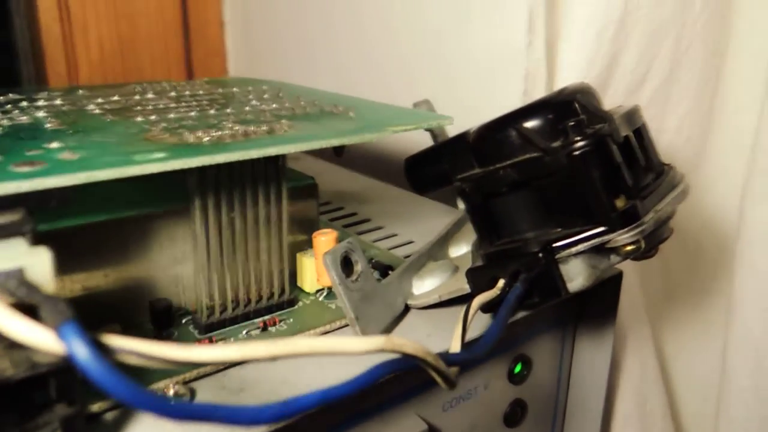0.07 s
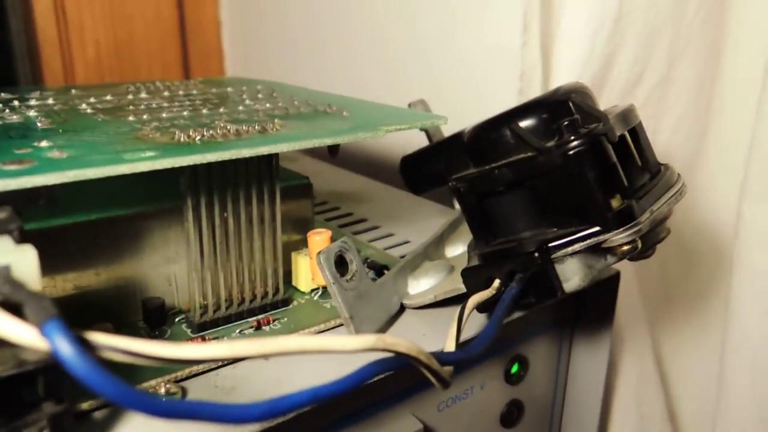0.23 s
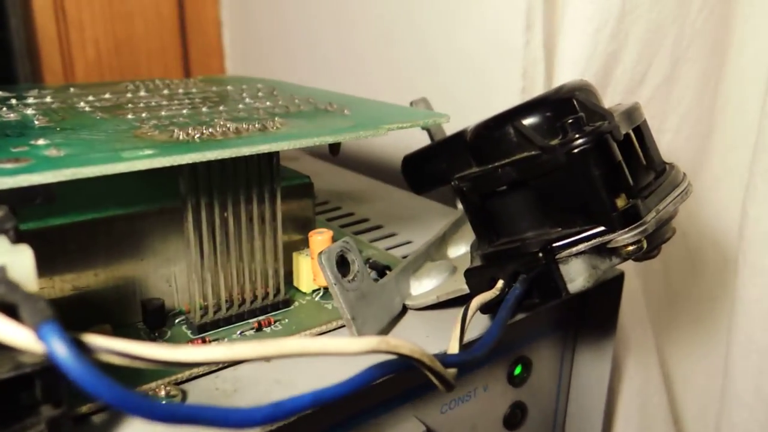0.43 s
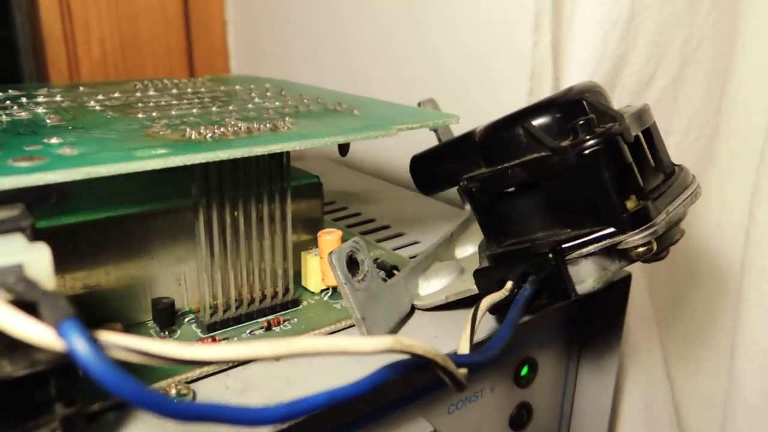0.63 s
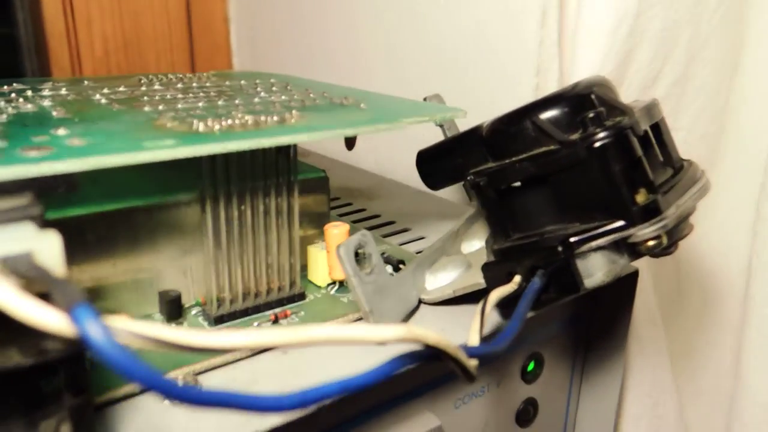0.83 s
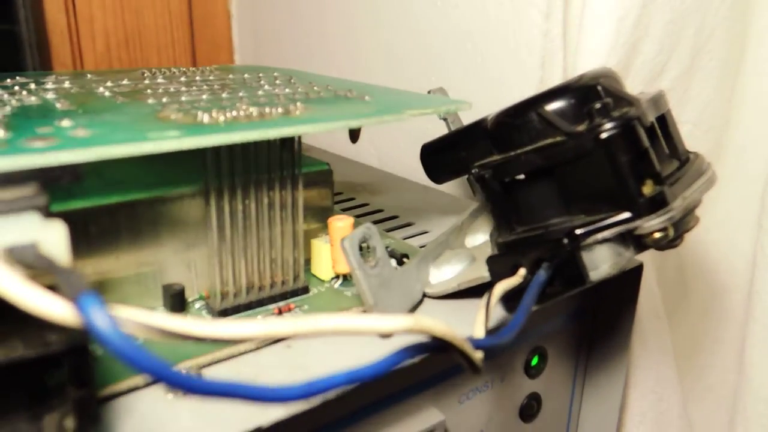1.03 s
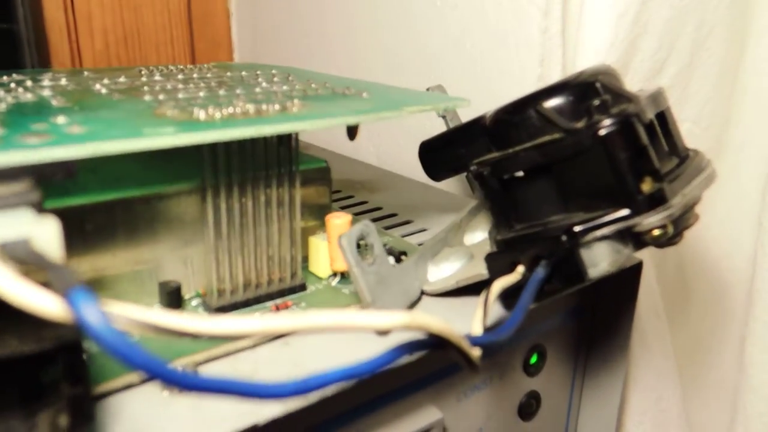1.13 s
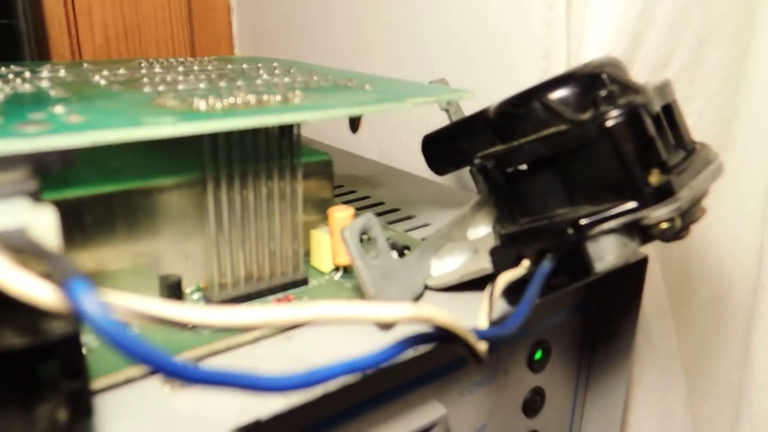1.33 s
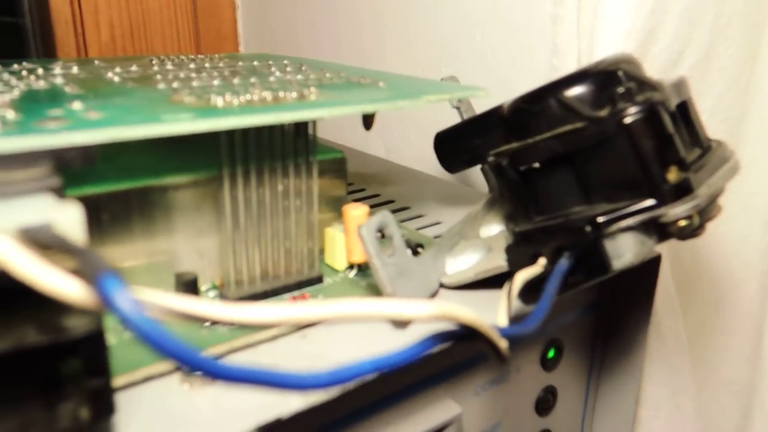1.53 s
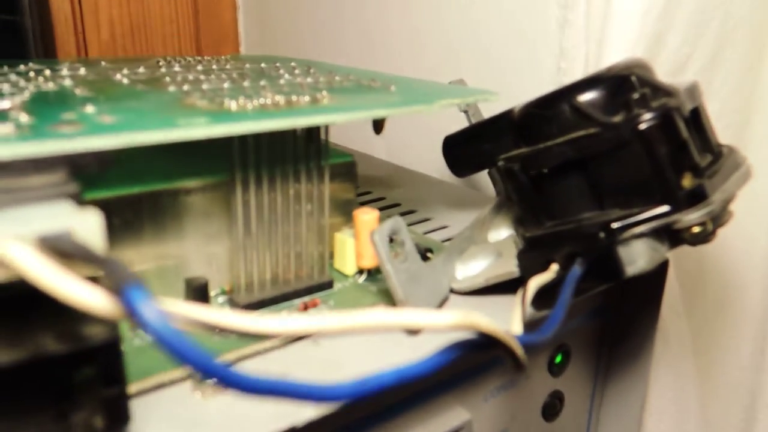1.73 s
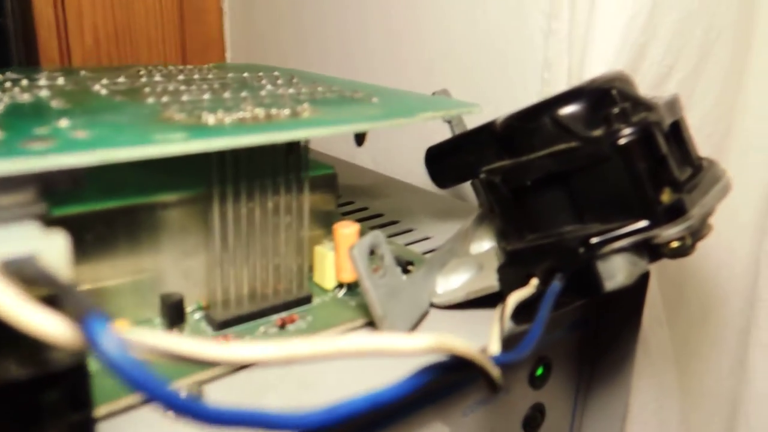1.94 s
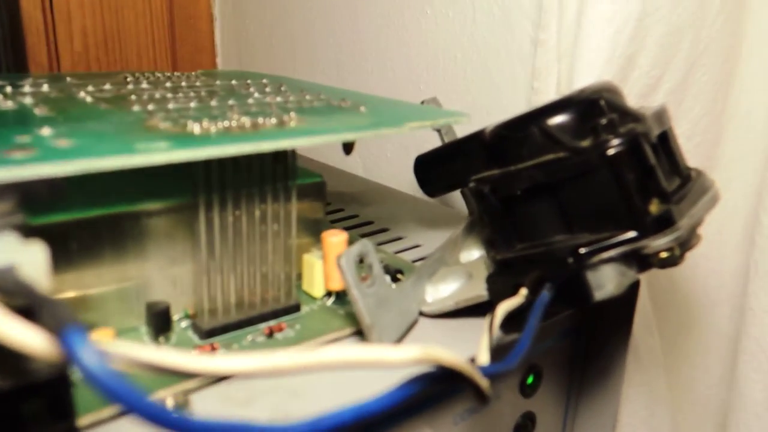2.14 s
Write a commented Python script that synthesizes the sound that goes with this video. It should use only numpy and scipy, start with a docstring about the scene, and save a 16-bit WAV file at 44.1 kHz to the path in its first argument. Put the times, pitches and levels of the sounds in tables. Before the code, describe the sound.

One sharp metallic relay click inside an electronic unit, with faint hiss behind it.

```python
"""Relay click in an opened unit

A relay snaps once, close and a little to the left: its armature strikes and bounces,
and frame and chassis ring briefly in a small, dry room. Behind it lie room noise, hiss,
a distant fan, a faint mains-modulated whine and, later, one soft low rumble."""
import sys
import numpy as np
from scipy import signal
from scipy.fft import rfft, irfft, next_fast_len
from scipy.io import wavfile
from scipy.ndimage import map_coordinates

SR = 44100
rng = np.random.default_rng(int(sys.argv[2]) if len(sys.argv) > 2 else 0)


def materialize(psi):
    """Save the field psi as 16-bit PCM at rate SR to the path in sys.argv[1].

    A 1-D psi becomes a single channel; in a 2-D psi each row is a channel.
    """
    bounded = np.clip(np.atleast_2d(psi).T, -1, 1)
    quanta = np.round(bounded * 32767).astype(np.int16)
    wavfile.write(sys.argv[1], SR, quanta)


N = 97020
TOP_HZ = 14300


def amp(db):
    """Decibels to gain."""
    return 10 ** (np.asarray(db) / 20)


def unit(x):
    """Scale each channel to rms 1."""
    return x / np.sqrt(np.mean(x ** 2, axis=-1, keepdims=True) + 1e-20)


def along(points, hz):
    """Interpolate (frequency, value) points on a log axis."""
    knots_hz, values = np.transpose(points)
    return np.interp(np.log(hz + 1), np.log(knots_hz + 1), values)


def pan(db):
    """Stereo gains for a left-minus-right level."""
    return amp([[db / 2], [-db / 2]])


def fade(t, t60_s):
    """Exponential decay, 60 dB in t60_s."""
    return np.exp(-np.log(1000) * t / t60_s)


def filtered(x, response):
    """Apply a frequency response by FFT."""
    size = x.shape[-1]
    padded = next_fast_len(2 * size)
    return irfft(rfft(x, padded) * response(np.fft.rfftfreq(padded, 1 / SR)), padded)[..., :size]


def noise(colour, size):
    """Two independent noises of the given spectrum, rms 1."""
    return unit(filtered(rng.standard_normal((2, size)), lambda hz: amp(along(colour, hz))))


def wobble(knots_per_s):
    """Smooth random curve."""
    return map_coordinates(rng.standard_normal(128), [np.arange(N) * knots_per_s / SR], mode="mirror")


def narrow_noise(hz, knots_per_s):
    """Tone of wandering level and phase, rms 1."""
    phase = 2 * np.pi * hz * np.arange(N) / SR
    return unit(wobble(knots_per_s) * np.sin(phase) + wobble(knots_per_s) * np.cos(phase))


# noise spectrum (frequency [Hz], relative density [dB])
NOISE_COLOUR = [(20, 0.3), (32, 2), (45, -4), (80, -3), (115, 0.8), (170, -3), (220, -2), (250, -3),
                (310, 0), (380, -6), (450, -7), (505, -6), (570, -8), (820, -7), (900, -7), (980, -6),
                (1100, -11), (1700, -14.5), (3000, -14.5), (4200, -17), (7000, -20), (14000, -20)]
# left-right likeness (frequency [Hz], correlation [0-1])
NOISE_CORRELATION = [(60, 0.8), (130, 0.78), (280, 0.64), (620, 0.42), (1350, 0.44), (2950, 0.25),
                     (6420, 0.034), (14000, 0.07)]


def room_noise(level_db=-48.5):
    """Steady room noise, near mono in the bass, under a wide hiss."""
    def mid_side_gains(hz):
        angle = np.arccos(along(NOISE_CORRELATION, hz)) / 2
        return np.array([np.cos(angle), np.sin(angle)])

    mid, side = filtered(noise(NOISE_COLOUR, N), mid_side_gains)
    return amp(level_db) * unit(np.array([mid + side, mid - side]))


# fan hum (frequency [Hz], level [dB])
FAN_TONES = [(285, -69.5), (506, -70), (646, -72), (824, -68), (985, -68)]


def fan():
    """Faint, blurred tones of a distant fan."""
    return sum(amp(db) * narrow_noise(hz, knots_per_s=22) for hz, db in FAN_TONES)


# whine lines (offset before rounding [ripple steps], mid-scene level [dB], drift [dB/s])
WHINE_LINES = [(-6, -90, 0), (-5.5, -78, 4), (-3, -82, -6), (-1, -71.5, -3), (0.5, -72, 1), (-2.5, -72, 1),
               (1.5, -72, 5.5), (2.5, -81, -7), (7.5, -77, 0), (9.5, -73.5, 0)]


def whine(centre_hz=10608, ripple_hz=100, noise_share=0.22, right_phase_rad=1.26):
    """Thin tones spaced by rectified mains ripple, wavering separately in each channel."""
    t, out = np.arange(N) / SR, np.zeros((2, N))
    for step, db, drift_db_per_s in WHINE_LINES:
        hz = centre_hz + round(step) * ripple_hz
        phase = 2 * np.pi * (hz * t + rng.random())
        steady = np.sqrt(2) * np.sin([phase, phase + right_phase_rad])
        waver = np.array([narrow_noise(hz, knots_per_s=8.8) for _ in range(2)])
        gain = amp(db + drift_db_per_s * (t - t.mean()))
        out += gain * unit(np.sqrt(1 - noise_share) * steady + np.sqrt(noise_share) * waver)
    return out


LEAD_S = 0.002  # room for the crack to build before each blow
CHANNEL_LAG_S = np.array([[0], [0.00008]])


def air_push(t, width_s=0.00041, suction=0.7, left_db=-4, right_db=-21):
    """Pressure pulse of a blow, followed by suction."""
    u = t / width_s
    return amp([[left_db], [right_db]]) * (1 - suction * u * u) * np.exp(-u * u / 2)


# crack spectrum (frequency [Hz], gain [dB], left minus right [dB])
CRACK_SPECTRUM = [(300, -24, 0), (1200, -8, -13), (1700, -8.5, -5), (2270, 10, 3), (2930, 13.5, 7),
                  (3750, 6, -4.5), (4940, 10.5, -8), (5600, 7.5, 14.5), (6600, 5.5, 15.5), (8000, 7, 3),
                  (8600, 1, 9.5), (10300, 3.5, 2), (11860, 5.5, -5), (12900, -9, -12), (14200, -3, -6)]


def crack(size, spread_s=0.00118):
    """Sharp pulse, dispersed in the metal: high bending waves outrun low ones."""
    hz = np.fft.rfftfreq(size, 1 / SR)
    points = np.array(CRACK_SPECTRUM)
    db, side_db = along(points[:, [0, 1]], hz), along(points[:, [0, 2]], hz)
    gain = amp([db + side_db / 2, db - side_db / 2])
    delay_s = LEAD_S + CHANNEL_LAG_S + spread_s * (1 - np.sqrt(np.minimum(hz / TOP_HZ, 1)))
    phase = -2 * np.pi * np.cumsum(delay_s, axis=1) * hz[1]
    return irfft(gain * np.exp(1j * phase), size)


# ring of the unit (band centre [Hz], level [dB], t60 [s], left minus right [dB])
RING_BANDS = [(174, -42, .07, 3), (462, -38.5, 0.066, 9), (1320, -28.5, 0.013, 12),
              (2190, -29, 0.029, -7.5), (3580, -28, 0.038, 1.5), (5070, -34, 0.028, 11),
              (6860, -27.5, 0.021, -9), (9800, -33, 0.011, -6), (11900, -33.5, 0.027, -5),
              (13500, -38, .016, 0)]


def dense_ring(t, attack_s=0.00028):
    """The unit's dense, quickly damped ring, as decaying noise bands."""
    out = np.zeros(t.shape)
    centres_hz = [row[0] for row in RING_BANDS]
    for hz, db, t60_s, side_db in RING_BANDS:
        band = [(centres_hz[0] / 2, 0)] + [(centre, float(centre == hz)) for centre in centres_hz]
        envelope = amp(db) * fade(t, t60_s) * (1 - np.exp(-t / attack_s))
        grain = filtered(rng.standard_normal(t.shape), lambda f: along(band, f))
        out += pan(side_db) * unit(grain * envelope) * np.sqrt(np.mean(envelope ** 2))
    return out


# chassis modes (frequency [Hz], level [dB], t60 [s], left minus right [dB])
CHASSIS_MODES = [(109, -42, 0.042, 21), (308, -30, 0.03, 14), (509, -27, 0.039, 3), (691, -27, 0.027, -13),
                 (770, -21, 0.028, -6.5), (1095, -29, 0.039, -6), (1220, -28, 0.011, -11),
                 (1400, -47, 0.036, 5), (1660, -28, 0.022, -6)]
# relay frame and armature modes (frequency [Hz], level [dB], t60 [s], left minus right [dB])
FRAME_MODES = [(2190, -32, .025, 10), (2338, -37.5, 0.06, 8), (2540, -35, 0.022, 2),
               (2830, -19.5, 0.024, 4), (2967, -20.5, .03, -6.5), (3500, -24, 0.014, 8),
               (4540, -42, 0.032, -1), (4804, -27, 0.023, 11), (5660, -35, 0.013, -4),
               (7200, -24.5, 0.012, 15), (6800, -45, 0.012, -10), (9220, -25.5, 0.015, -2),
               (11300, -36, .008, 0), (11920, -36, .014, -12)]


def metal_modes(t):
    """Damped vibration of the struck chassis, frame and armature."""
    return sum(amp(db) * pan(side_db) * np.cos(2 * np.pi * hz * t) * fade(t, t60_s)
               for hz, db, t60_s, side_db in CHASSIS_MODES + FRAME_MODES)


def blow(attack_s=0.00008):
    """One armature contact: air push, modes, dense ring and crack."""
    size = SR // 10
    t = np.maximum(np.arange(size) / SR - LEAD_S - CHANNEL_LAG_S, 0)
    body = air_push(t) + metal_modes(t) + dense_ring(t)
    return body * (1 - np.exp(-t / attack_s)) + crack(size)


# armature contacts (time [s], gain [dB], low-pass corner [Hz])
ARMATURE_CONTACTS = [(0.2039, 1, 15800), (0.2111, -8.5, 4500), (0.2138, -14, 2000), (0.2169, -17.5, 2000),
                     (0.248, -29, 2500)]


def relay():
    """The armature strikes, then bounces, softer and duller."""
    out, hit = np.zeros((2, N)), blow()
    for time_s, db, corner_hz in ARMATURE_CONTACTS:
        start = round((time_s - LEAD_S) * SR)
        dulled = filtered(hit, lambda hz: 1 / (1 + 1j * hz / corner_hz))
        out[:, start:start + hit.shape[1]] += amp(db) * dulled
    return out


# reverb spectrum (frequency [Hz], relative level [dB])
REVERB_COLOUR = [(100, -2.5), (1000, -3), (3000, -10.5), (7000, -13), (14000, -15)]


def reverb(x, gain_db=-24, t60_s=0.24):
    """Faint, short tail of a furnished room."""
    t = np.arange(SR // 2) / SR
    tail = noise(REVERB_COLOUR, len(t)) * fade(t, t60_s)
    tail /= np.linalg.norm(tail[0])
    return amp(gain_db) * signal.fftconvolve(x, tail, axes=1)[:, :N]


# rumble envelope (time [s], level [dB])
RUMBLE_ENVELOPE = [(1.06, -70), (1.093, -52.5), (1.135, -51), (1.185, -44), (1.215, -62)]
# rumble noise spectrum (frequency [Hz], relative density [dB])
RUMBLE_SPECTRUM = [(40, -14), (90, 0), (125, 1), (200, -7.5), (400, -23), (1000, -45), (3000, -80)]


def rumble(start_hz=128, sag_hz_per_s=183, noise_share=0.27):
    """Brief, rough low rumble, sinking in pitch."""
    t = np.arange(N) / SR
    times_s, db = np.transpose(RUMBLE_ENVELOPE)
    start_s, end_s = times_s[0], times_s[-1]
    hz = start_hz - sag_hz_per_s * (np.clip(t, start_s, end_s) - start_s)
    tone = np.sqrt(2) * np.sin(2 * np.pi * np.cumsum(hz) / SR)
    rough = noise(RUMBLE_SPECTRUM, N)[0]
    envelope = amp(np.interp(t, times_s, db)) * (t > start_s) * (t < end_s)
    return envelope * (np.sqrt(1 - noise_share) * tone + np.sqrt(noise_share) * rough)


def scene():
    """One click and its reverb over the background."""
    click = relay()
    return click + reverb(click) + room_noise() + fan() + whine() + rumble()


def record(dry):
    """Brick-wall low-pass at TOP_HZ."""
    return filtered(dry, lambda hz: hz < TOP_HZ)


dry = scene()
out = record(dry)
materialize(out)
```